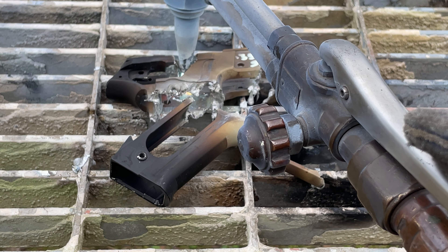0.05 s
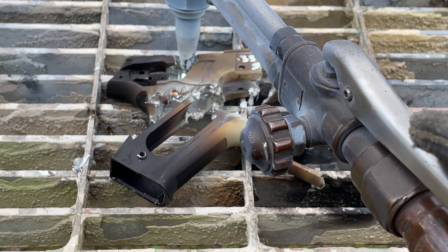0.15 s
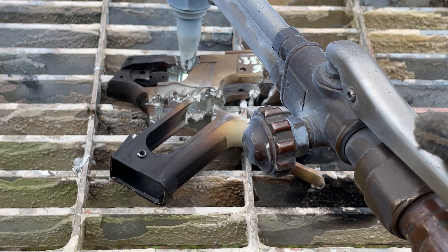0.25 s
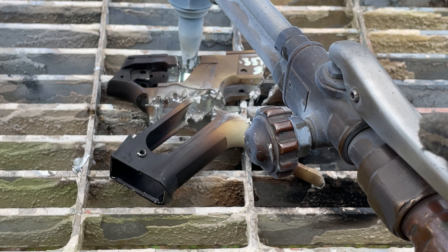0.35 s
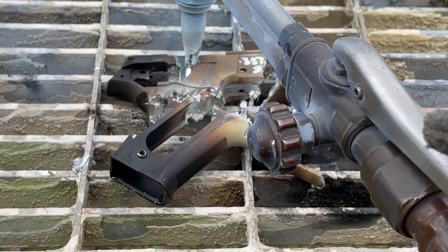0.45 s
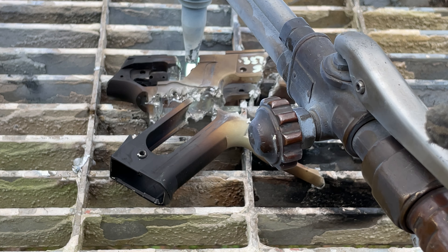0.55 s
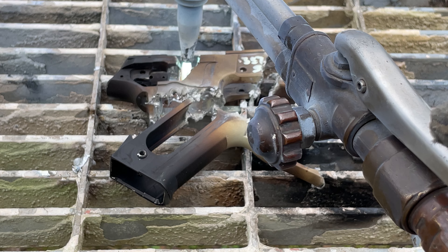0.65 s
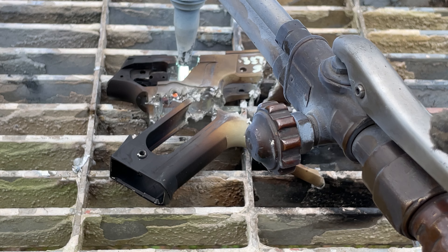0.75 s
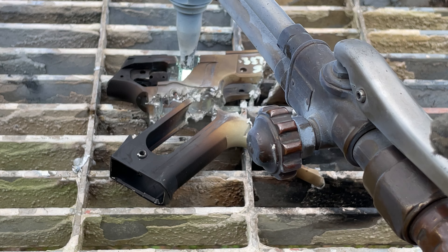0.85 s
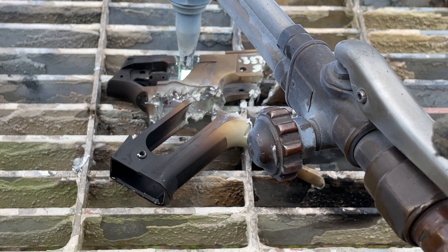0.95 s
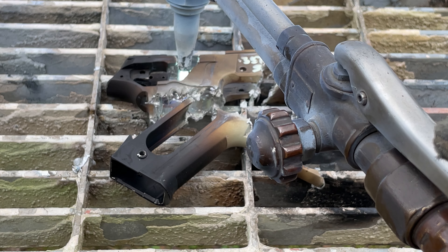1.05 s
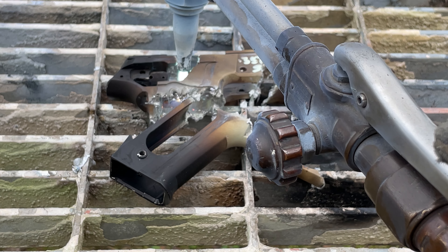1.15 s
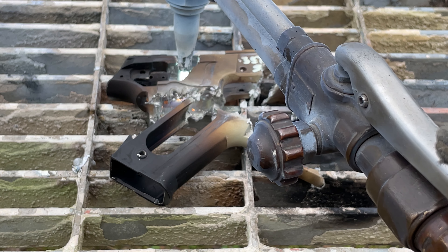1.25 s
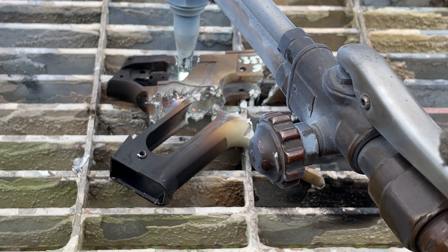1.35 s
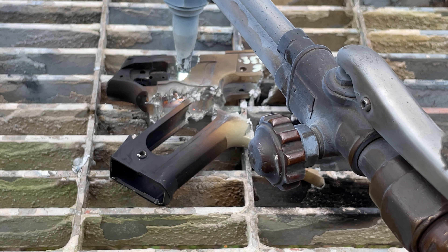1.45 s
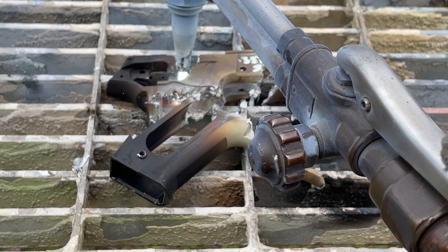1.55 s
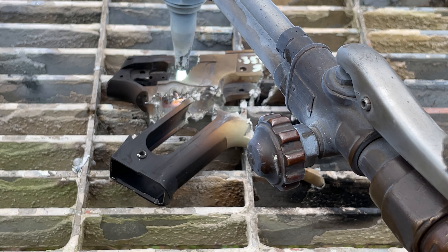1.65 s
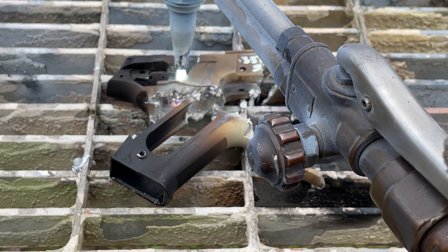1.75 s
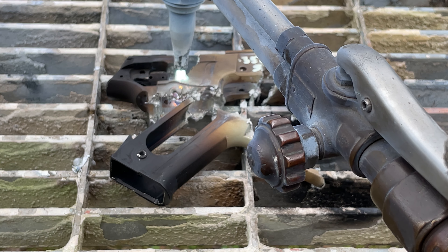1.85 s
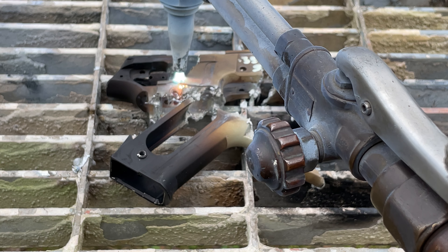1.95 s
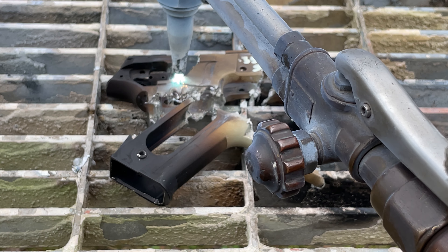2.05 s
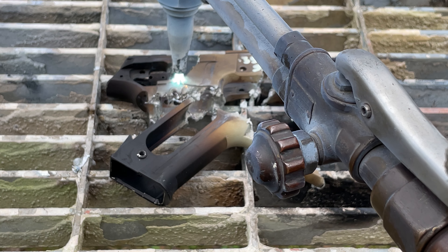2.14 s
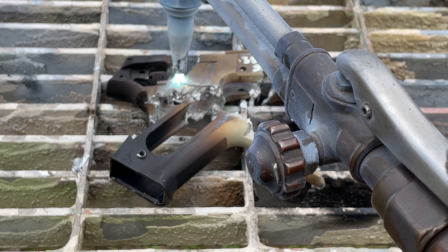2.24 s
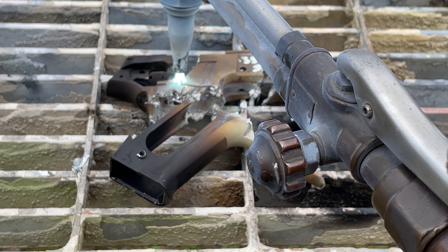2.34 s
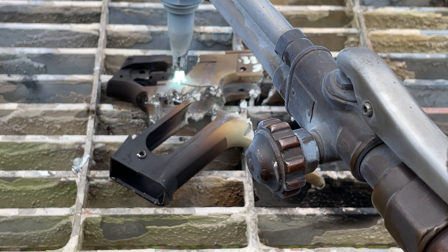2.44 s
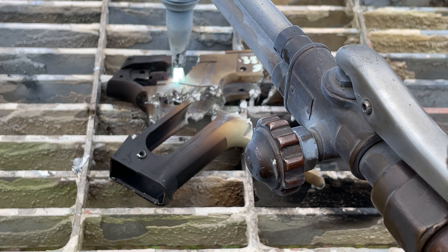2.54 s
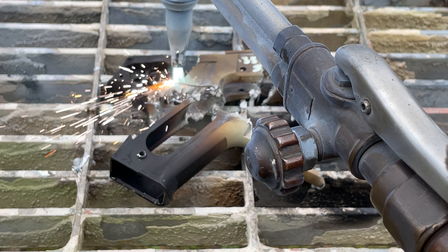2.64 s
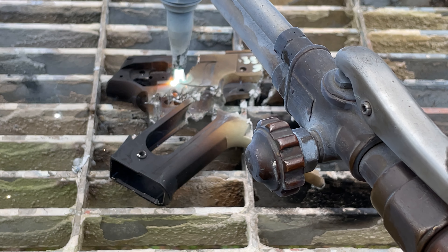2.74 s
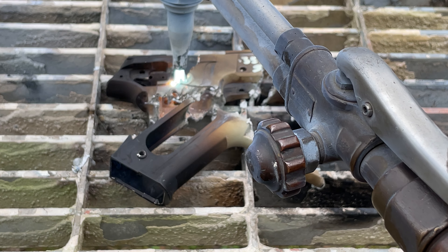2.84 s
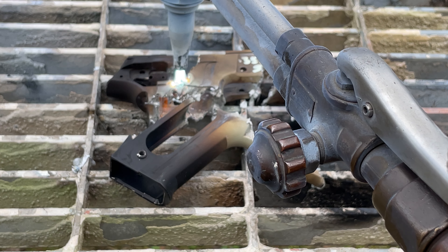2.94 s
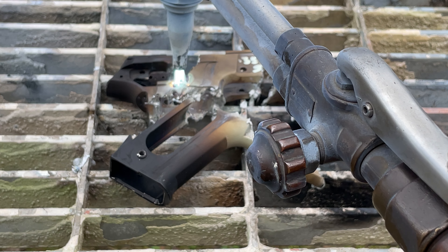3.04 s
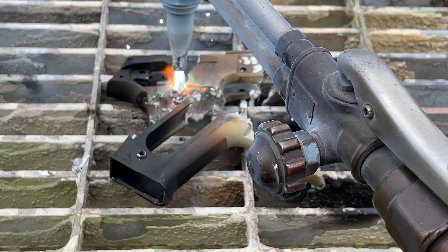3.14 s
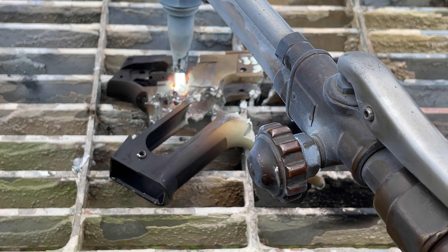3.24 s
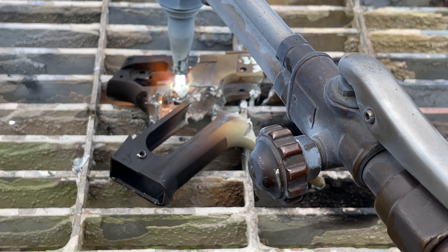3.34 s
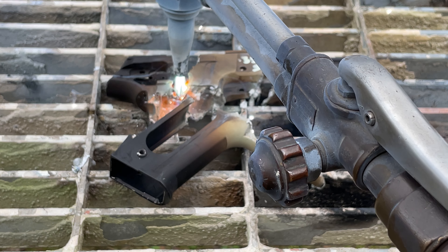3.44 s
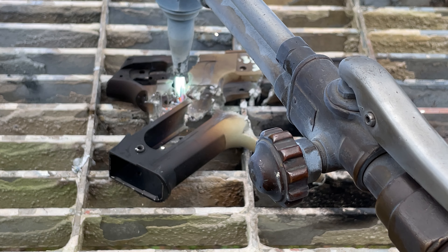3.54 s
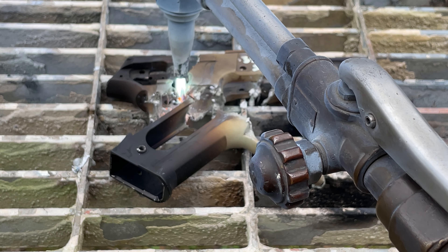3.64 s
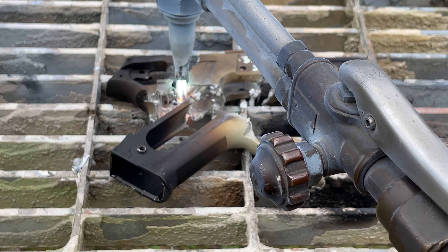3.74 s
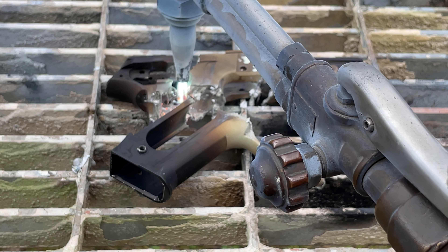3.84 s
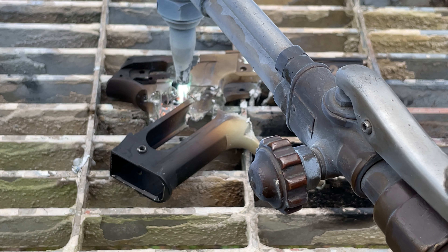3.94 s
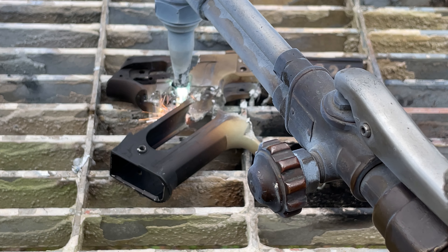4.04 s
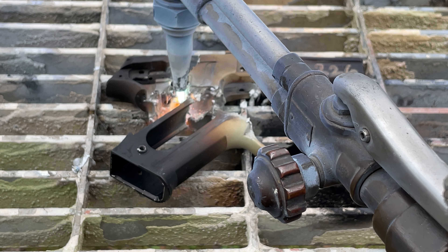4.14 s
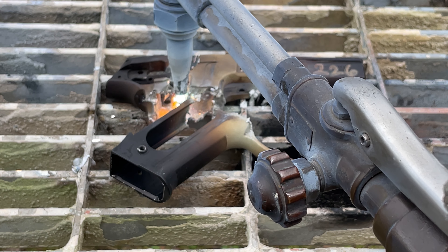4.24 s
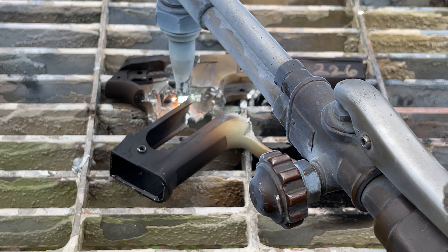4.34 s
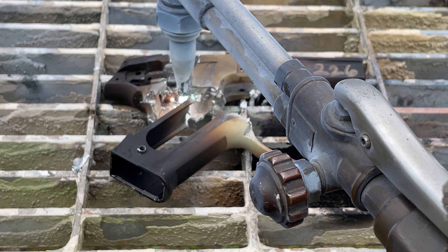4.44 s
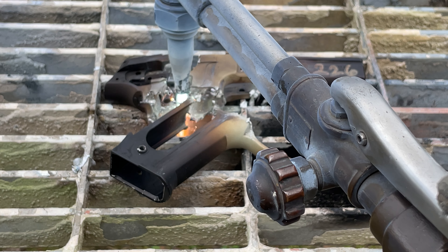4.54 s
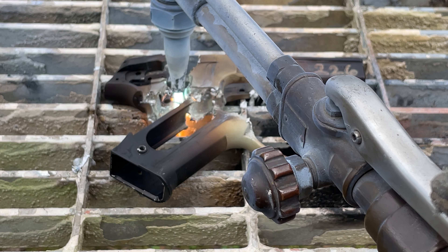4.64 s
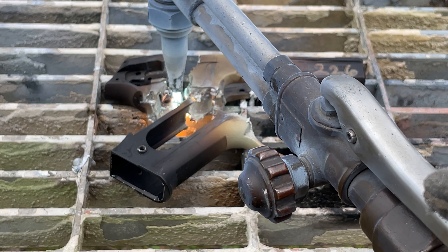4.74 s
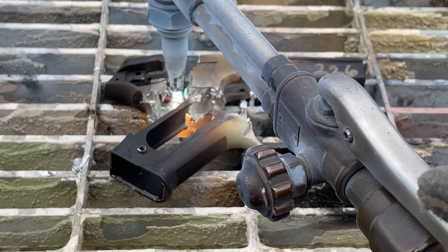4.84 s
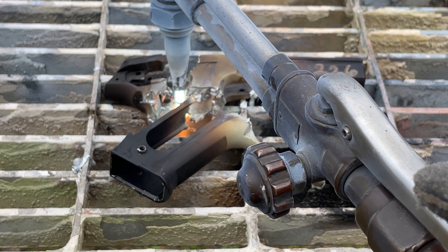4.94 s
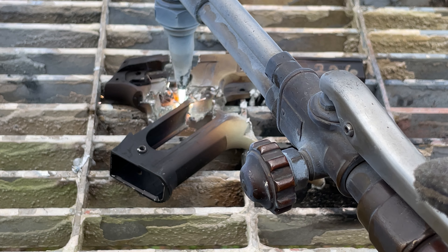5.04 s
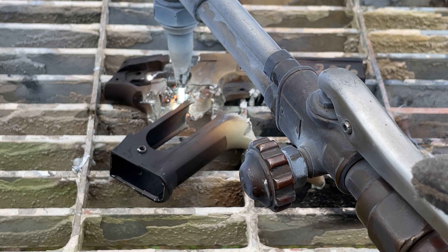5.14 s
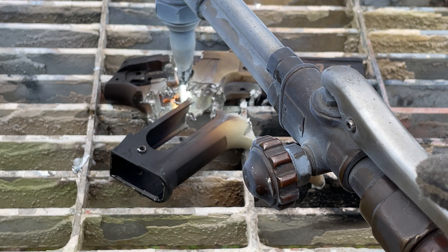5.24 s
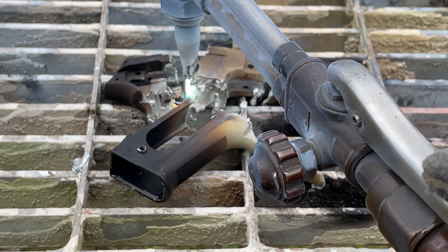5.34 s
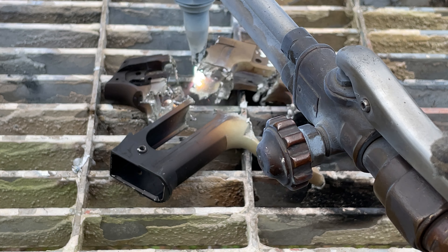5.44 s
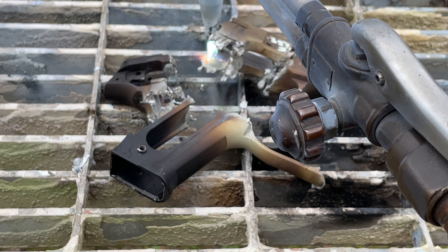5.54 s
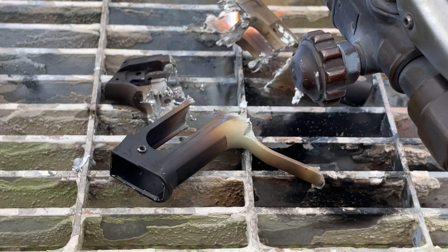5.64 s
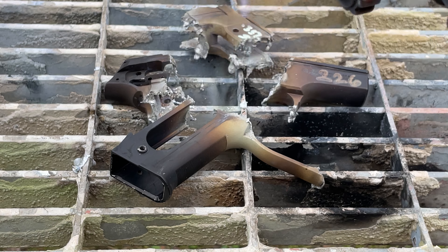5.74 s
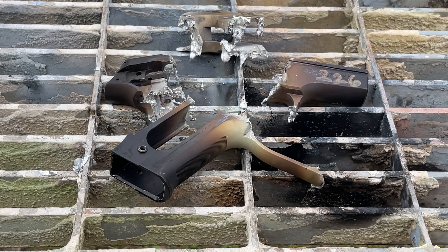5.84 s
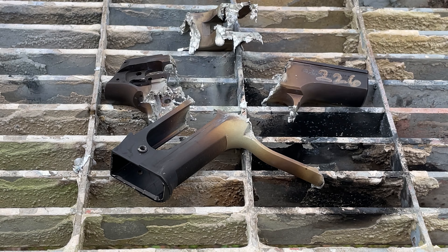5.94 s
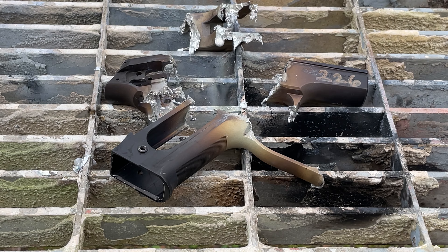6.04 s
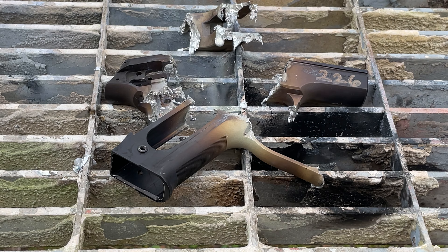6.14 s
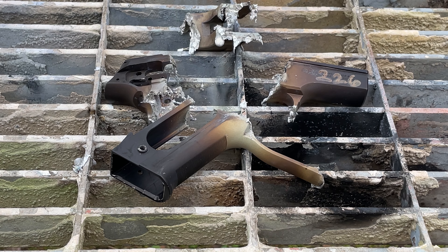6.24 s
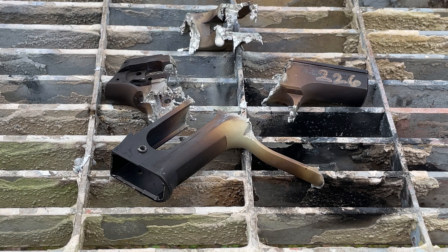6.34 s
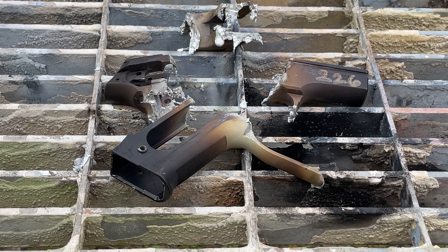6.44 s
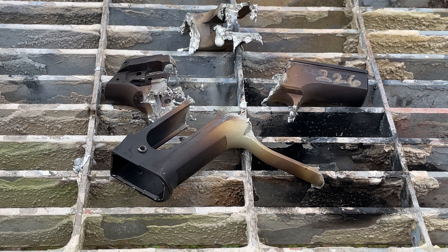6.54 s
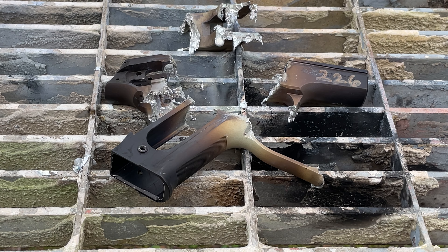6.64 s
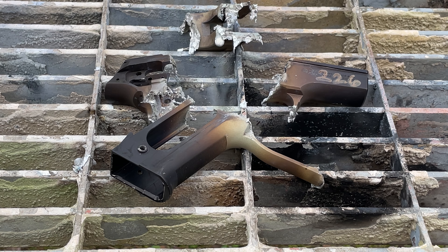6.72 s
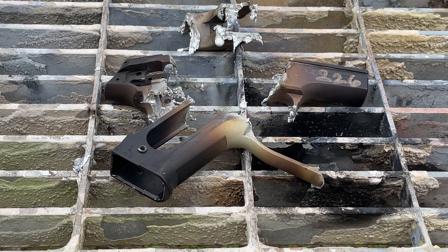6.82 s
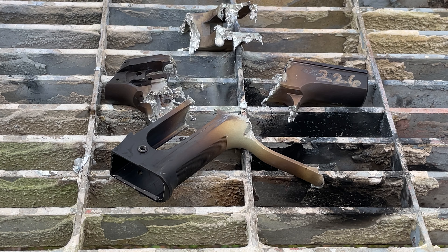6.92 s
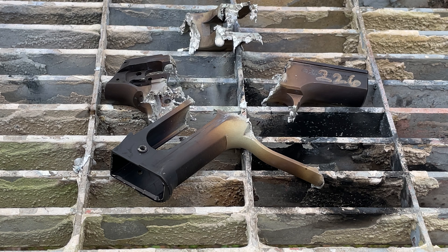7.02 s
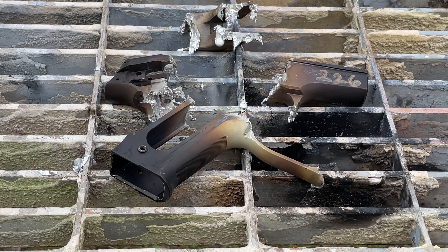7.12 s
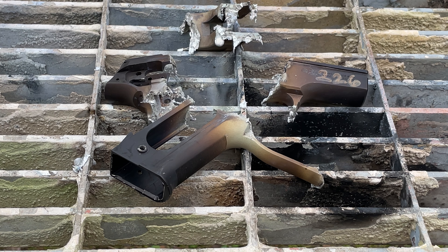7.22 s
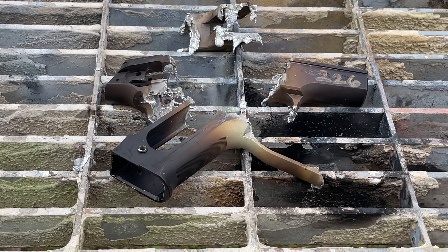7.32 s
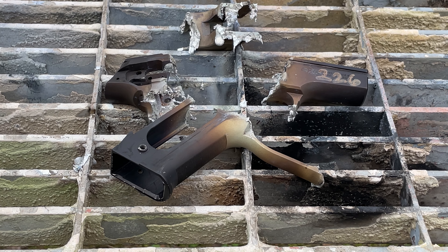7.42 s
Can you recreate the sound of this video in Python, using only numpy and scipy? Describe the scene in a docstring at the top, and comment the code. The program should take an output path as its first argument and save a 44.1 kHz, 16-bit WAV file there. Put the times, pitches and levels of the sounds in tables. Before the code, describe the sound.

A cutting torch burns metal on a steel grate, heard very close in stereo with wide treble and little room sound. From 0 to 0.4 s the jet spits in rough, low sputters with a fuzzy whistle, then surges strongly near 0.7 s. A dense, bright hiss continues, swelling around 1.8 s above a faint low hum. From about 2.1 to 3.1 s it fizzes more sharply; tiny melt pops follow at 3.1 and 3.4 s, around a brief dip. Airy high whistling colours the hiss from 3.5 to 4.5 s, then it turns hollow and roaring until 5.1 s, and briefly again near 5.4 s. At 5.6 s the jet shuts abruptly. At 5.76 s a cut piece cracks on the grate, with small bounces, a short skid and slag ticks. A low flame flutter and soft hiss swell to about 6.5 s, then ease slightly, with soft puffs to the end near 7.3 s.

```python
"""A steel grate over a table, with a cutting torch burning through a metal part close to the microphone.
The jet is noise coloured over time: it sputters in the melt, hisses, changes colour, and stops.
A low flutter and soft hiss of the flame, also noise, lie beneath; they swell after the jet and remain.
Gas whistles and puffs are narrow noise bands, the hum a sine, and pops of melt are falling sines.
A cut-off piece knocks on the grate with decaying sines and noise, and skids; hot slag ticks."""
import sys
import numpy as np
from scipy import signal
from scipy.fft import rfft, irfft
from scipy.io import wavfile
from scipy.ndimage import uniform_filter1d

SR = 44100
rng = np.random.default_rng(int(sys.argv[2]) if len(sys.argv) > 2 else 0)


def file_out(sig):
    """Save sig as 16-bit WAV at sys.argv[1]."""
    # one column per channel
    cols = np.atleast_2d(sig).T
    # limit, then scale
    lim = np.clip(cols, -1, 1)
    pcm = np.round(lim * 32767).astype(np.int16)
    wavfile.write(sys.argv[1], SR, pcm)


N = 329868
T = np.arange(N) / SR

# Noise grid: window and hop in samples, its frequencies in Hz and frame times in seconds.
SIZE, HOP = 1024, 256
HZ = np.fft.rfftfreq(SIZE, 1 / SR)
TIMES = np.arange(N // HOP + 5) * HOP / SR


def amp(db):
    """Decibels to gain."""
    return 10 ** (np.asarray(db) / 20)


def unit(x):
    """Scales to rms 1."""
    return x / np.sqrt(np.mean(x ** 2) + 1e-20)


def read(points, hz):
    """Reads a spectrum on a log-frequency axis."""
    f, value = np.transpose(points)
    return np.interp(np.log(hz + 1), np.log(f + 1), value)


def curves(rows, t):
    """Reads every column of a time table."""
    s, *columns = np.transpose(rows)
    return [np.interp(t, s, column) for column in columns]


def add(mix, s, sound):
    """Mixes a sound in at time s in seconds."""
    part = mix[max(round(s * SR), 0):][:len(sound)]
    part += sound[:len(part)]


def tint(x, colour):
    """Gives x a spectrum, at rms 1."""
    gain = amp(read(colour, np.fft.rfftfreq(len(x), 1 / SR)))
    return unit(irfft(rfft(x) * gain, len(x)))


def wobble(hz):
    """Random motion that weakens above the rate hz, at rms 1."""
    f = np.fft.rfftfreq(N, 1 / SR)
    slow = rfft(rng.standard_normal(N)) / (1 + (f / hz) ** 2)
    return unit(irfft(slow, N))


def band_db(colour, lo, hi):
    """Level that a noise of this colour has between lo and hi."""
    in_band = (HZ >= lo) * (HZ < hi)
    return 10 * np.log10(np.mean(amp(read(colour, HZ)) ** 2 * in_band))


def turbulence(field_db, same, patchy_db):
    """Two-channel noise that follows a dB field over time and frequency, with drifting patches."""
    a, b, c, d, patches = rng.standard_normal((len(TIMES), len(HZ), 5)).T
    patches = uniform_filter1d(patches, size=9, axis=0)
    patches = unit(uniform_filter1d(patches, size=16, axis=1))
    likeness = np.clip(read(same, HZ), -1, 1)[:, None]
    left = a + 1j * b
    right = likeness * left + np.sqrt(1 - likeness ** 2) * (c + 1j * d)
    channels = np.array([left, right])
    channels *= amp(field_db + patchy_db * patches) * np.sqrt(3 / SIZE)
    return signal.istft(channels, nperseg=SIZE, noverlap=SIZE - HOP)[1][:, :N]


def spells(rows, catch_s):
    """A control that sets in at each start, holds its value, and lets go at each end."""
    total = 0
    for start, end, value in rows:
        on, off = np.tanh((TIMES - start) / catch_s), np.tanh((TIMES - end) / catch_s)
        total = total + value / 2 * (on - off)
    return total


def reflections(table_s=.0045, table_gain=.12, grate_s=.00135, grate_gain=.13, sway=.07):
    """Echoes from the grate and the table below comb the hiss as the hand sways: a dB field."""
    drift = 1 + sway * np.interp(TIMES, T, wobble(.8))
    grate_delay_s = grate_s * drift
    table_delay_s = table_s + grate_s * (drift - 1)  # both paths change by the same time
    grate = grate_gain * np.exp(-2j * np.pi * HZ[:, None] * grate_delay_s)
    table = table_gain * np.exp(-2j * np.pi * HZ[:, None] * table_delay_s)
    return 20 * np.log10(abs(1 + grate + table))


# The jet bites harder into the melt, or slips through a gap.
# Each row: middle in seconds, half-width in seconds, gain in dB.
JET_SURGES = [(.05, 0.038, 2), (.68, 0.1, 8.5), (1.76, 0.19, 4.5), (2.12, .03, 4), (2.7, 0.1, -2.5),
              (3.02, 0.032, 1.7), (3.37, .14, -9), (3.68, 0.25, 2.5), (4.03, 0.11, 1.6), (4.83, 0.19, 2.5),
              (5.17, 0.13, -1.5), (5.64, 0.046, -9)]
SURGE_SHARPNESS = 1.26  # exponent: 2 is a round swell, 1 a pointed one


def surges():
    """The passing rises and falls of the jet's force, in dB."""
    return sum(db * np.exp(-abs((TIMES - s) / width) ** SURGE_SHARPNESS) for s, width, db in JET_SURGES)


# Colour of the jet close to the metal. Each row: frequency in Hz, density in dB per Hz.
JET_SPECTRUM = [(50, -36), (130, -19.5), (240, -5), (480, -4.5), (680, -7.5), (1100, -1), (1500, -5.5),
                (1950, -3.5), (2350, -5.5), (3100, 0), (4500, -2.3), (6000, -3.5), (8000, -1),
                (10500, -5.5), (12700, -8), (14000, -10.5), (15600, -3.5)]
# Likeness of the two channels of the jet noise. Each row: frequency in Hz, likeness (1 narrow, lower wider).
JET_LIKENESS = [(500, .965), (1000, 1), (2200, .993), (4400, 1), (5900, .85), (7000, 1), (8400, 1),
                (9700, .84), (11300, 1), (13400, .75), (13900, 1), (15000, 1), (15800, .75)]
# Roar of gas in the melt, dying down as the jet pierces. Each row: time in seconds, level in dB.
ROAR_LEVEL = [(0, -31.5), (.7, -32.5), (2.08, -37), (2.4, -41.5), (2.8, -39), (5.6, -41.5)]
# The jet splits on a thin edge and fizzes. Each row: start in seconds, end in seconds, gain in dB.
EDGE_SPELLS = [(2.09, 2.6, 7), (2.6, 2.78, 5), (2.78, 3.12, 6.5), (3.54, 4.37, 3.5), (4.37, 4.47, 9)]
# The jet blows into a hollow and roars. Each row: start in seconds, end in seconds, strength 0 to 1.
HOLLOW_SPELLS = [(4.52, 5.08, 0.97), (5.37, 5.52, 0.7)]
# Resonances of the hollow at strength 1. Each row: frequency in Hz, gain in dB.
HOLLOW_RESONANCES = [(250, 0.5), (1150, 7), (2100, 3.5), (3400, 2.5), (4200, -1), (4850, 4), (5650, -2.5),
                     (7000, -1)]
EDGE_CATCH_S, HOLLOW_CATCH_S = 0.0064, 0.028
JET_OFF_S, SHUT_DB_PER_S = 5.632, 906
# Hiss and fizz ease steadily as the cut deepens; fizz starts at a level relative to the hiss.
HISS_DB, EASE_DB_PER_S = -27.5, 1.11
FIZZ_REL_DB, FIZZ_EASE_DB_PER_S = -9, 0.61
FIZZ_FOLLOWS, ROAR_FOLLOWS = 1.18, 0.11  # shares of a surge that fizz and roar take


def jet(flicker_db=0.5, flicker_hz=70, waver_db=0.25, waver_hz=7):
    """Gas tears over the metal: roar from inside the cut, hiss from the nozzle, fizz from the edge."""
    surge_db = surges()
    hiss_db = HISS_DB - EASE_DB_PER_S * TIMES + surge_db
    fizz_db = HISS_DB + FIZZ_REL_DB - FIZZ_EASE_DB_PER_S * TIMES
    fizz_db += FIZZ_FOLLOWS * surge_db + spells(EDGE_SPELLS, EDGE_CATCH_S)
    roar_db = curves(ROAR_LEVEL, TIMES)[0] + ROAR_FOLLOWS * surge_db
    # each level is set against what its band of the colour already holds
    hiss_gain_db = hiss_db - band_db(JET_SPECTRUM, 2500, 6000)
    roar_gain_db = roar_db - band_db(JET_SPECTRUM, 400, 1800)
    fizz_gain_db = fizz_db - band_db(JET_SPECTRUM, 9300, 13000)
    roar_share = read([(1300, 1.0), (3000, 0)], HZ)[:, None]
    fizz_share = read([(4900, 0), (10500, 1.03), (15000, 1.33)], HZ)[:, None]
    field_db = read(JET_SPECTRUM, HZ)[:, None] + reflections()
    field_db += (1 - roar_share - fizz_share) * hiss_gain_db
    field_db += roar_share * roar_gain_db + fizz_share * fizz_gain_db
    field_db += read(HOLLOW_RESONANCES, HZ)[:, None] * spells(HOLLOW_SPELLS, HOLLOW_CATCH_S)
    valve_db = -SHUT_DB_PER_S * np.maximum(T - JET_OFF_S, 0)
    # the trembling melt shakes all frequencies together
    tremble_db = flicker_db * wobble(flicker_hz) + waver_db * wobble(waver_hz)
    return turbulence(field_db, JET_LIKENESS, patchy_db=1.12) * amp(valve_db + tremble_db)


SWELL_DB, SWELL_START_S, SWELL_PEAK_S = 11.5, 5.61, 6.48
SWELL_NARROWNESS = 1.2  # exponent: higher is a briefer swell


def swell():
    """Rise and slower fall of the free flame, in dB."""
    age = np.maximum(TIMES - SWELL_START_S, 0) / (SWELL_PEAK_S - SWELL_START_S)
    return SWELL_DB * (age * np.exp(1 - age)) ** SWELL_NARROWNESS


# The free flame flares or sinks. Each row: middle in seconds, half-width in seconds, gain in dB.
FLAME_GUSTS = [(5.9, .035, 2.5), (6.09, .13, -1.5), (6.34, .1, 2.5), (6.78, .08, 1.5)]


def gusts():
    """Brief flares and lulls of the free flame, in dB."""
    return sum(db * np.exp(-((TIMES - s) / width) ** 2) for s, width, db in FLAME_GUSTS)


# Colour of the low flutter. Each row: frequency in Hz, density in dB per Hz.
FLUTTER_SPECTRUM = [(50, -21), (110, -8), (180, 2), (280, -3.5), (400, -6.5), (560, -11), (1050, -18),
                    (1450, -30), (3000, -59)]
# Colour of the soft hiss. Each row: frequency in Hz, density in dB per Hz.
SOFT_SPECTRUM = [(1150, -1), (1450, -7), (1850, 0), (2700, 1.5), (3500, -8), (4600, -9), (5350, -4),
                 (6200, -13), (7850, -9), (9200, -17), (10400, -16), (11100, -9.5), (12500, -17),
                 (14200, -11), (15800, -18)]
# Likeness of the two channels of the flame noise. Each row: frequency in Hz, likeness (1 narrow, lower wider).
FLAME_LIKENESS = [(130, .95), (700, .65), (1500, .3), (2500, .88), (4200, .97), (6200, .75), (7000, 1),
                  (8500, 1), (9800, .72), (11300, .95)]
# Lean of the flame to one side. Each row: frequency in Hz, left channel over right in dB.
FLAME_LEAN = [(60, -3), (200, -0.5), (700, -4.5), (1300, -4.5), (2400, 5), (4400, -0.5), (7000, 2.2)]
# Levels before the swell; the share of the swell that the soft hiss takes.
FLUTTER_DB, SOFT_DB, SOFT_FOLLOWS = -51.5, -64.5, 0.37
DARKEN_OCTAVES_PER_S = 0.068


def flame(lumpy_db=1.3, lumpy_hz=22):
    """Burning gas flutters low and hisses softly; both swell, and the flutter darkens, as the jet is shut."""
    low_db = FLUTTER_DB + swell() + gusts() - band_db(FLUTTER_SPECTRUM, 130, 900)
    high_db = SOFT_DB + SOFT_FOLLOWS * swell() - band_db(SOFT_SPECTRUM, 1800, 6000)
    # reading the colour ever higher up slides it down in pitch
    darker = 2 ** (DARKEN_OCTAVES_PER_S * (np.maximum(TIMES, SWELL_START_S) - SWELL_PEAK_S))
    flutter_field_db = read(FLUTTER_SPECTRUM, HZ[:, None] * darker) + low_db
    soft_field_db = read(SOFT_SPECTRUM, HZ)[:, None] + high_db
    flutter = turbulence(flutter_field_db, FLAME_LIKENESS, patchy_db=0.7)
    soft = turbulence(soft_field_db, FLAME_LIKENESS, patchy_db=1.0)
    both = flutter * amp(lumpy_db * wobble(lumpy_hz)) + soft
    side_db = read(FLAME_LEAN, np.fft.rfftfreq(N, 1 / SR))
    return irfft(rfft(both) * amp([side_db / 2, -side_db / 2]), N)


# Colour of the deep burn. Each row: frequency in Hz, density in dB per Hz.
RUMBLE_SPECTRUM = [(20, -25), (35, -8.5), (55, 17), (90, 6), (120, -12), (250, -18), (600, -52)]
RUMBLE_DB, RUMBLE_FOLLOWS = -51.5, 0.38  # level before the swell; share of the swell that it takes


def rumble(lumpy_db=2):
    """The deep, uneven burn of the flame under everything."""
    level_db = RUMBLE_DB + RUMBLE_FOLLOWS * swell() - band_db(RUMBLE_SPECTRUM, 30, 110)
    burn = turbulence(read(RUMBLE_SPECTRUM, HZ)[:, None] + level_db, JET_LIKENESS, patchy_db=1.5)
    return burn * amp(lumpy_db * wobble(15.0))


def gliding(rows, evenness=.55):
    """Narrow resonances driven by turbulence, sliding in pitch; evenness 0-1 steadies their strength."""
    out = np.zeros(N)
    for start, end, first_hz, last_hz, width, db in rows:
        n = max(int((end - start) * SR), HOP)
        drive = rng.standard_normal(N) + 1j * rng.standard_normal(N)
        narrow = signal.butter(2, width / 2, fs=SR, output="sos")
        # a quarter second of run-in lets the filter settle
        sway = signal.sosfilt(narrow, drive[:n + SR // 4])[-n:]
        sway = sway / abs(sway) ** np.clip(evenness, 0, 1)
        turns = np.cumsum(np.geomspace(first_hz, last_hz, n)) / SR
        tone = (sway * np.exp(2j * np.pi * turns)).real
        add(out, start, amp(db) * unit(tone) * signal.windows.tukey(n, .3))
    return out


# Fuzzy whistles of gas at edges and holes of the hot metal. Each row: start in seconds,
# end in seconds, first pitch in Hz, last pitch in Hz, width in Hz, level before the fades in dB.
GAS_WHISTLES = [(0, .45, 3900, 3670, 350, -36), (.355, .407, 354, 343, 35, -31.5),
                (.415, .448, 322, 240, 60, -36), (.47, .66, 882, 1247, 141, -39),
                (1.25, 1.65, 9900, 10100, 200, -54), (3.18, 3.25, 1544, 1290, 240, -36.5),
                (3.25, 3.325, 1188, 877, 220, -40), (3.475, 3.555, 438.5, 430, 260, -41.5),
                (3.55, 4.25, 8700, 8250, 1500, -37), (3.55, 4.5, 6350, 6610, 900, -35.5),
                (5.845, 5.922, 8950, 6340, 450, -48), (5.9, 6.95, 2856, 2300, 700, -65.5),
                (5.95, 6.5, 1148, 848, 700, -52.5)]


def whistles():
    """Gas sings over edges and holes as gliding bands of noise."""
    return gliding(GAS_WHISTLES)


# Low puffs of the flame. Each row: start in seconds, end in seconds, first pitch in Hz,
# last pitch in Hz, width in Hz, level before the fades in dB.
FLAME_PUFFS = [(0, .052, 171.6, 134, 25, -38), (.93, .975, 85, 55, 26, -35.5),
               (1.2, 1.36, 340, 326, 60, -45), (5.41, 5.49, 80, 75, 27, -40.5),
               (5.67, 5.77, 85, 95, 50, -44), (6.67, 6.85, 85, 80, 55, -42),
               (7.05, 7.22, 196.4, 186, 70, -43)]


def puffs():
    """The flame puffs as short, low, gliding bands of noise."""
    return gliding(FLAME_PUFFS)


# The flame spits and gusts. Each row: middle in seconds, level before the fades in dB,
# length in seconds, pitch of the cavity in Hz.
GAS_SPUTTERS = [(0.027, -29.5, 0.039, 336), (0.05, -25, 0.022, 890), (0.089, -28, 0.02, 340),
                (0.141, -27, 0.031, 366), (.148, -29, 0.02, 780), (0.172, -29, 0.027, 348),
                (0.254, -30.5, 0.034, 380), (0.305, -30, 0.073, 500), (.342, -26, .02, 340),
                (0.349, -23, 0.022, 580), (4.533, -36, .025, 457), (5.358, -38, .03, 380),
                (5.395, -33.5, .026, 1300), (6.053, -44.5, 0.02, 650), (7.048, -49, 0.014, 1000)]


def sputters(cavity_db=7.0, cavity_width=0.13):
    """Short blasts of gas, each with one broad resonance."""
    out = np.zeros(N)
    f = np.geomspace(50, 16000, num=120)
    splash_db = read([(150, -14), (320, 2.5), (1200, -1), (2000, -16), (12000, -38)], f)
    for s, db, length, hz in GAS_SPUTTERS:
        n = int(length * SR)
        ring_db = cavity_db * np.exp(-(np.log(f / hz) / cavity_width) ** 2)
        blast = tint(rng.standard_normal(n), np.transpose([f, splash_db + ring_db]))
        add(out, s - length / 2, amp(db) * blast * np.sqrt(np.hanning(n)))
    return out


HUM_HZ, HUM_DB, HUM_PEAK_S, HUM_HALF_WIDTH_S = 91.5, -44, 1.9, .55


def hum(waver_db=1.5, waver_hz=4, stray_hz=.8):
    """A thin low tone, wavering in pitch and level, swells under the jet and dies away."""
    turns = np.cumsum(HUM_HZ + stray_hz * wobble(waver_hz)) / SR
    rise_and_fall = np.exp(-((T - HUM_PEAK_S) / HUM_HALF_WIDTH_S) ** 2)
    level = amp(HUM_DB + waver_db * wobble(waver_hz)) * rise_and_fall
    return level * np.sin(2 * np.pi * turns)


# Pops of the melt. Each row: start in seconds, peak level in dB, length in seconds,
# first pitch in Hz, last pitch in Hz.
MELT_POPS = [(3.108, -43, .022, 900, 520), (3.118, -36, .006, 3000, 1500), (3.119, -35, 0.018, 560, 65),
             (3.442, -31.5, 0.016, 380, 150)]


def pops():
    """A bubble of melt opens: a brief tone that falls in pitch."""
    out = np.zeros(N)
    for s, db, length, first_hz, last_hz in MELT_POPS:
        n = int(length * SR)
        turns = np.cumsum(np.geomspace(first_hz, last_hz, n)) / SR + rng.random()
        add(out, s, amp(db) * np.sin(2 * np.pi * turns) * signal.windows.tukey(n, .5))
    return out


# Ticks of hot slag. Each row: start in seconds, level at the onset in dB.
SLAG_TICKS = [(3.448, -34), (5.744, -50), (5.843, -36), (6.222, -45)]
# Colour of a tick. Each row: frequency in Hz, density in dB per Hz.
TICK_SPECTRUM = [(500, -22), (4000, -6), (8000, 6), (11000, -9), (16000, -16)]


def ticks(tick_t60=0.027):
    """Hot slag ticks: bright noise that dies at once."""
    out, t = np.zeros(N), np.arange(SR // 3) / SR
    for s, db in SLAG_TICKS:
        tick = tint(rng.standard_normal(len(t)), TICK_SPECTRUM)
        add(out, s, amp(db - 60 * t / tick_t60) * tick)
    return out


# The cut-off piece lands and bounces. Each row: start in seconds, level in dB, share of ring 0 to 1.
PIECE_KNOCKS = [(5.7592, -27, 0.84), (5.7643, -35, 1), (5.774, -42, .5), (5.781, -45, .4),
                (5.8105, -48, .3), (5.8399, -36.5, .15), (5.849, -49, .15)]
# Ring of piece and grate. Each row: frequency in Hz, relative level in dB, 60 dB decay in seconds.
PIECE_MODES = [(537, -19, .13), (985, -17, .11), (1595, -17, .06), (1900, -18, .065), (2430, -12, .025),
               (3180, -10, 0.087), (3845, -7, .055), (4390, -1, .09), (4460, -6, 0.082), (4725, -10, .07),
               (4975, 1, .053), (5465, -2, .045)]
# Colour of the crack. Each row: frequency in Hz, density in dB per Hz.
CRACK_SPECTRUM = [(150, -21), (700, -4), (1200, -6), (2800, 0.5), (4900, 0), (6200, -1), (12000, -17),
                  (16000, -25)]


def knocks(ring_db=-2, crack_db=-1, crack_t60=0.041, tail_db=-21, tail_t60=0.33, contact_s=0.00038):
    """The piece cracks against the grate as noise with a weak tail, and its modes ring briefly."""
    out, t = np.zeros(N), np.arange(SR // 3) / SR
    for s, db, rings in PIECE_KNOCKS:
        ring = np.zeros(len(t))
        for hz, mode_db, t60 in PIECE_MODES:
            ring += amp(mode_db - 60 * t / t60) * np.sin(2 * np.pi * (hz * t + rng.random()))
        fade = amp(crack_db - 60 * t / crack_t60) + amp(tail_db - 60 * t / tail_t60)
        crack = fade * tint(rng.standard_normal(len(t)), CRACK_SPECTRUM)
        blow = rings * amp(ring_db) * ring + crack
        add(out, s, amp(db) * blow * np.minimum(t / contact_s, 1))
    return out


# The piece skids between its bounces. Each row: start in seconds, end in seconds,
# first pitch in Hz, last pitch in Hz, width in Hz, level before the fades in dB.
PIECE_SKIDS = [(5.808, 5.824, 1510, 1300, 1100, -47), (5.82, 5.86, 851, 703, 1100, -45)]


def skid():
    """The piece scrapes along the grate as broad, falling bands of noise."""
    return gliding(PIECE_SKIDS)


def scene():
    """Torch and metal; all but jet, flame and rumble are the same in both channels."""
    torch = jet() + flame() + rumble() + whistles() + puffs() + sputters() + hum() + pops()
    metal = ticks() + knocks() + skid()
    return torch + metal


# Phase of the left channel over the right: the treble is wide, in places opposed.
# Each row: frequency in Hz, phase in radians.
TREBLE_PHASE = [(0, 0), (4400, 0), (5600, -1.1), (6300, -1.4), (7000, -np.pi), (8500, -np.pi), (9700, -1.6),
                (10700, -.1), (11700, 0), (13600, 2.3), (13900, np.pi), (15050, np.pi), (15700, 4)]
EDGE_HZ = 15830  # upper band limit


def record(dry, low_cut_hz=42):
    """Treble phase differs between channels; then the low cut and the band limit."""
    turn = np.interp(np.fft.rfftfreq(N, 1 / SR), *np.transpose(TREBLE_PHASE))
    channels = irfft(rfft(dry) * np.exp(.5j * np.array([turn, -turn])), N)
    low_cut = signal.butter(3, low_cut_hz, "high", fs=SR, output="sos")
    channels = signal.sosfilt(low_cut, channels)
    band_limit = signal.firwin(601, EDGE_HZ, window=("kaiser", 9), fs=SR)
    return signal.oaconvolve(channels, band_limit[None], "same")


dry = scene()
out = record(dry)
file_out(out)
```